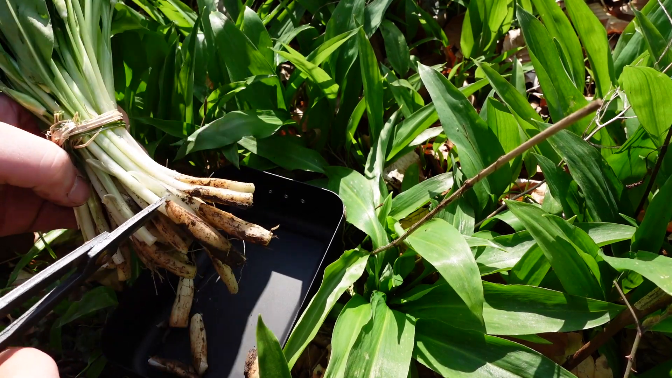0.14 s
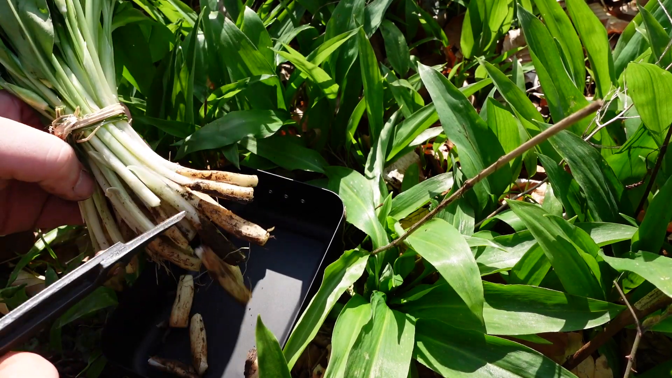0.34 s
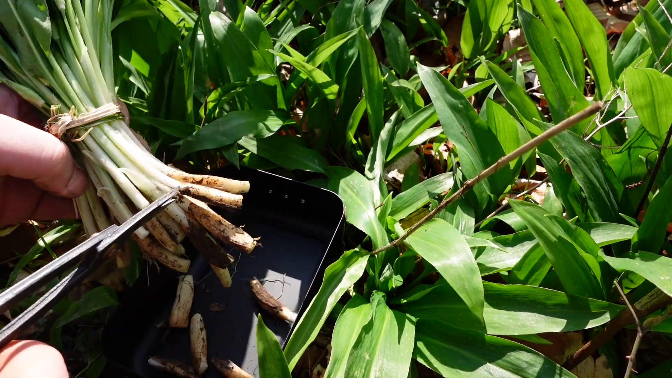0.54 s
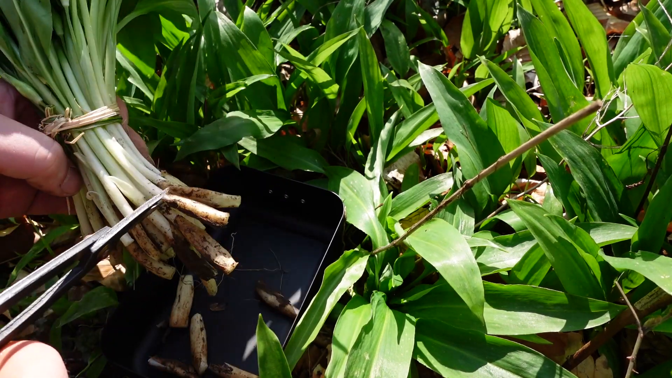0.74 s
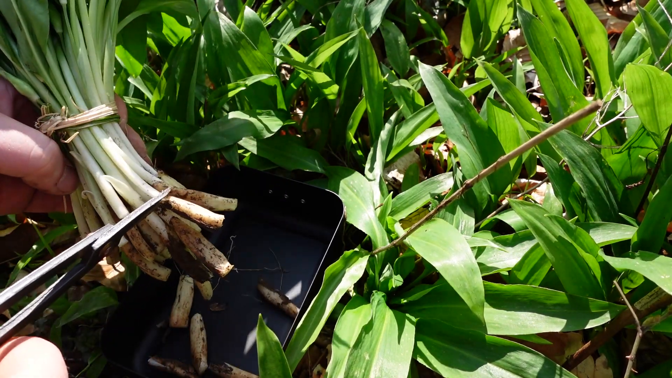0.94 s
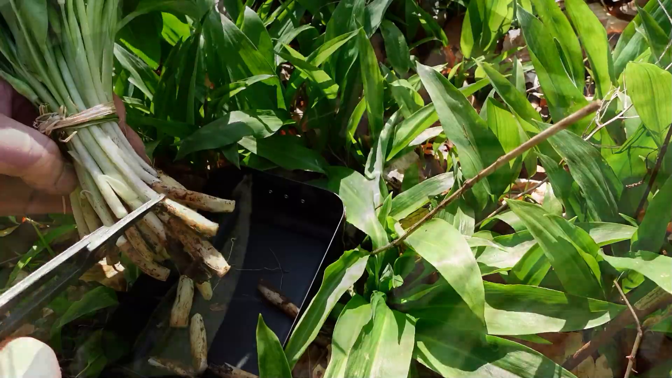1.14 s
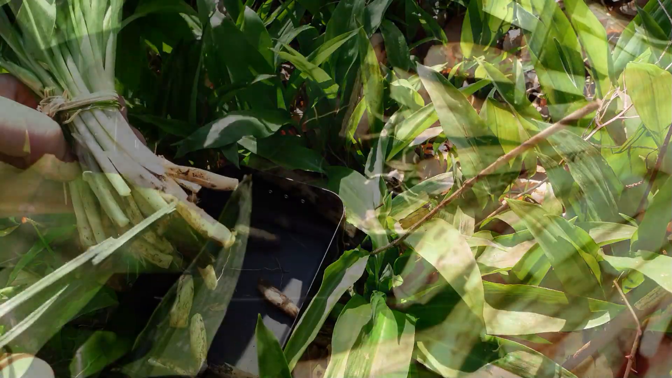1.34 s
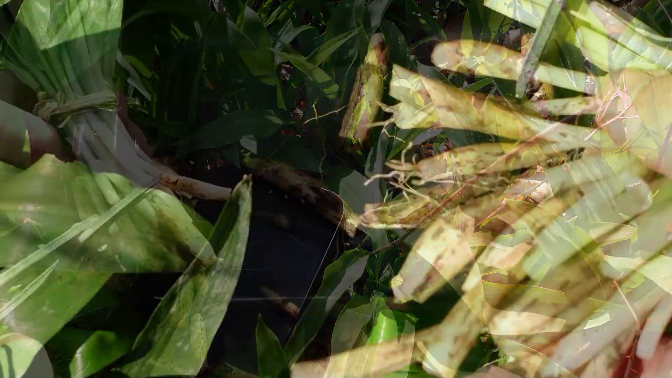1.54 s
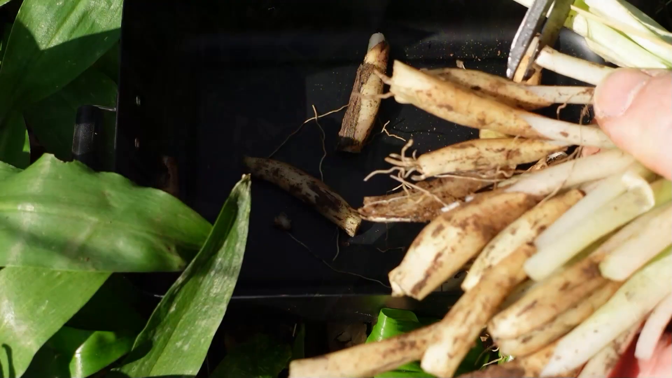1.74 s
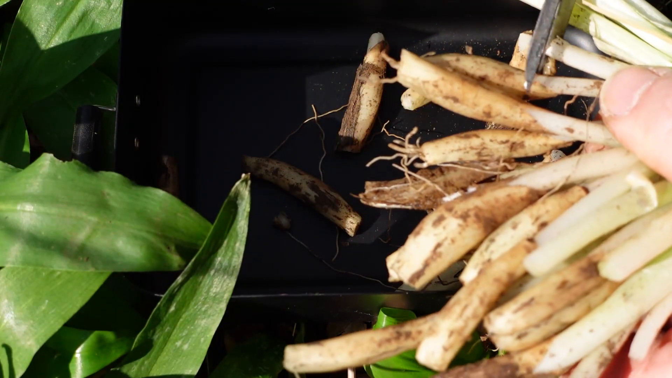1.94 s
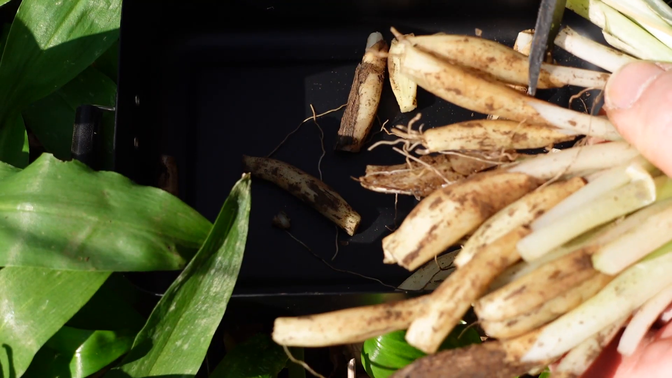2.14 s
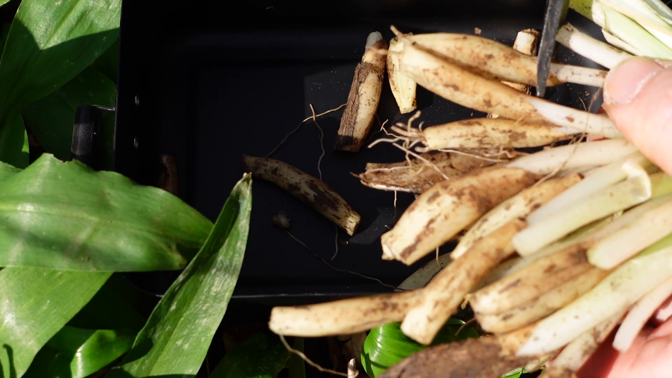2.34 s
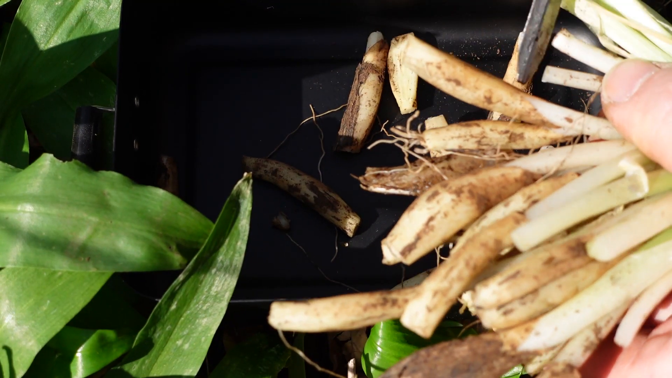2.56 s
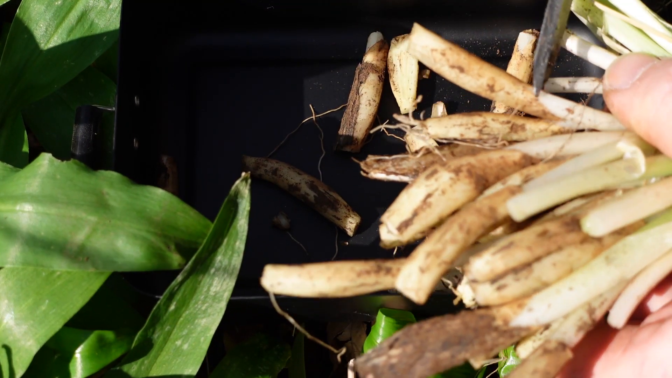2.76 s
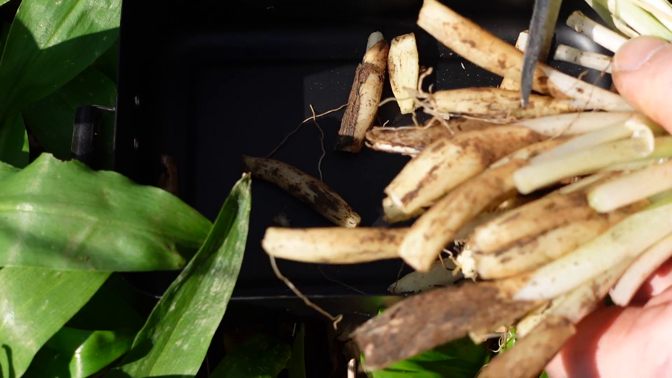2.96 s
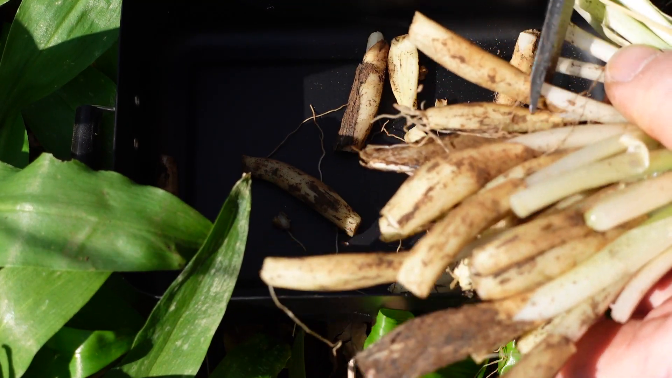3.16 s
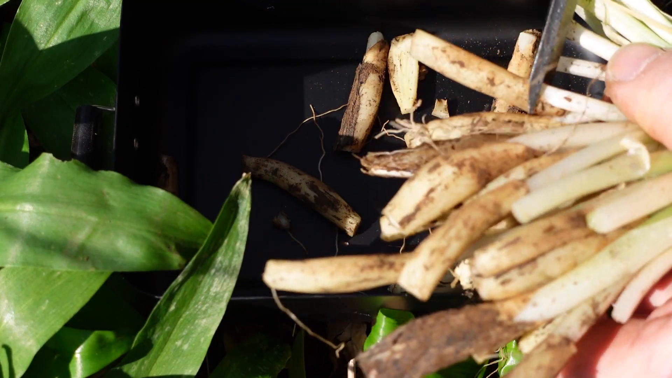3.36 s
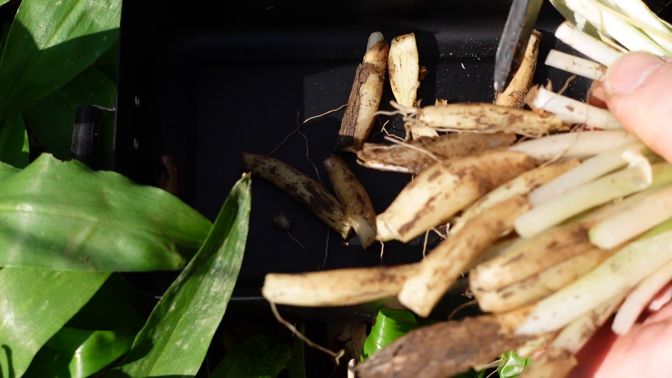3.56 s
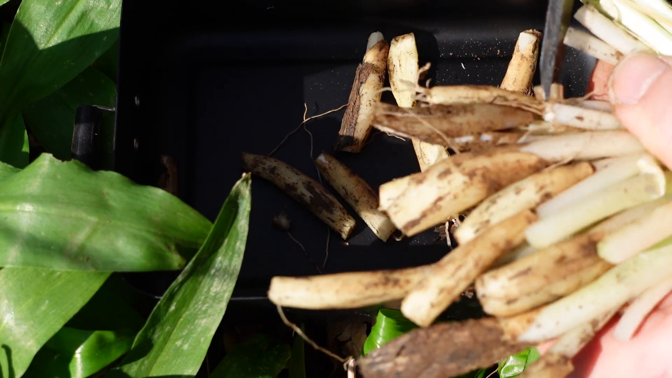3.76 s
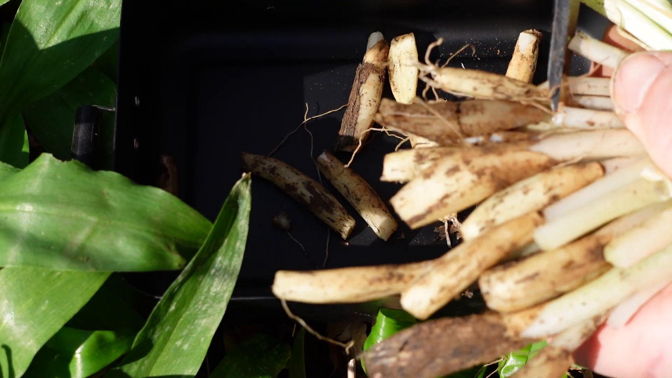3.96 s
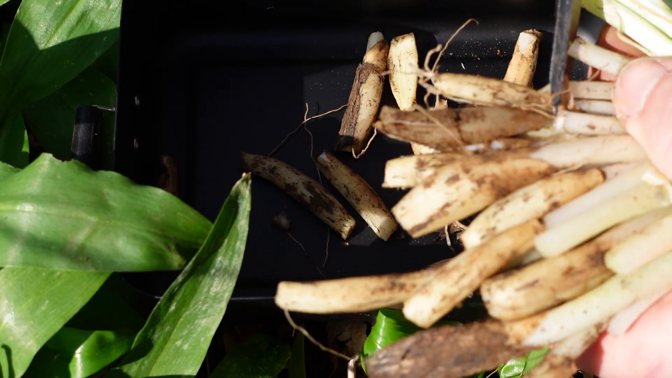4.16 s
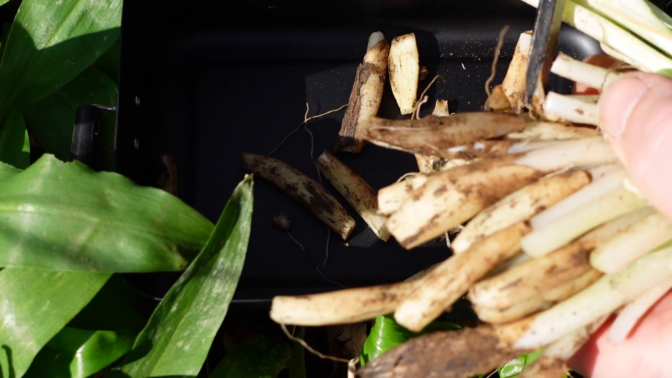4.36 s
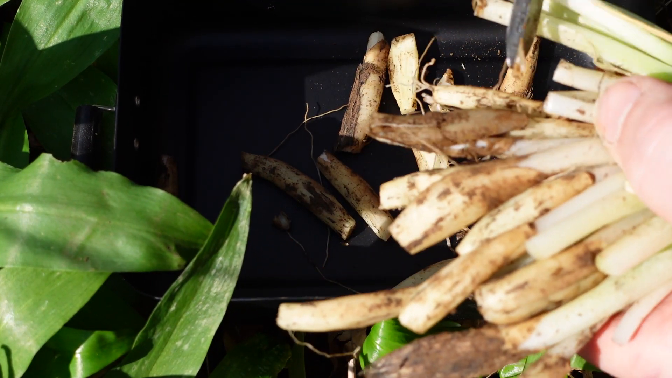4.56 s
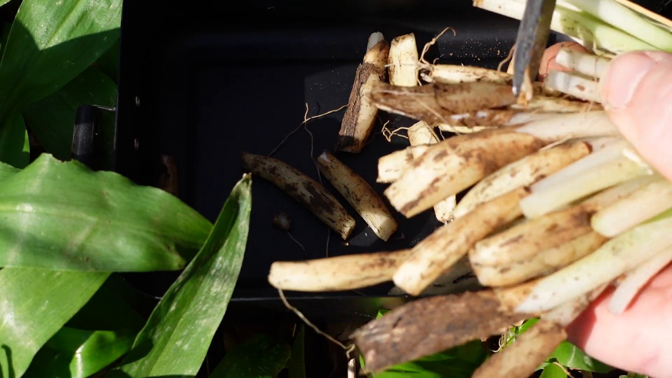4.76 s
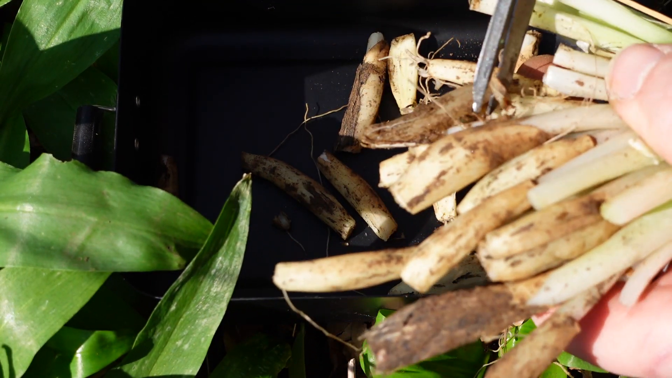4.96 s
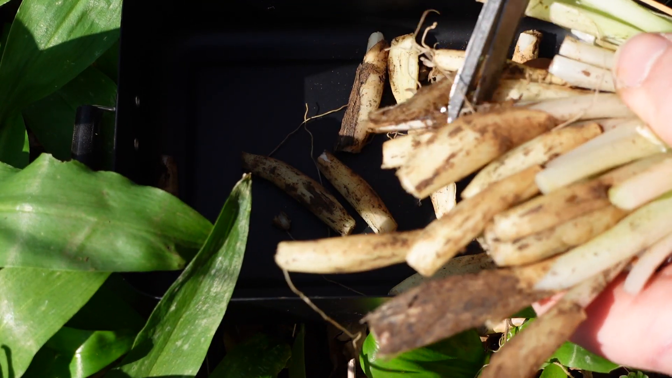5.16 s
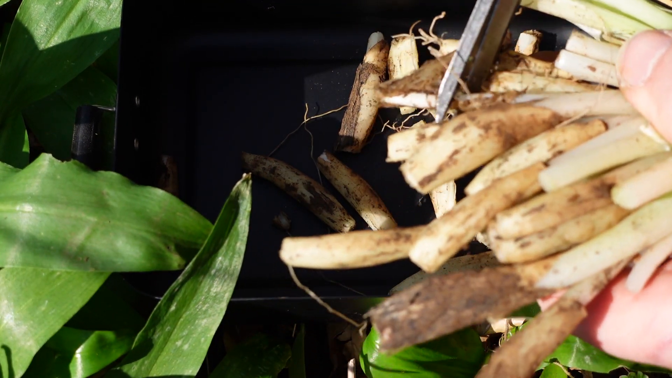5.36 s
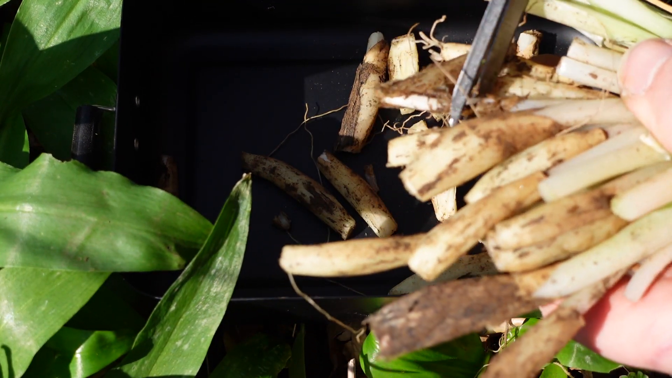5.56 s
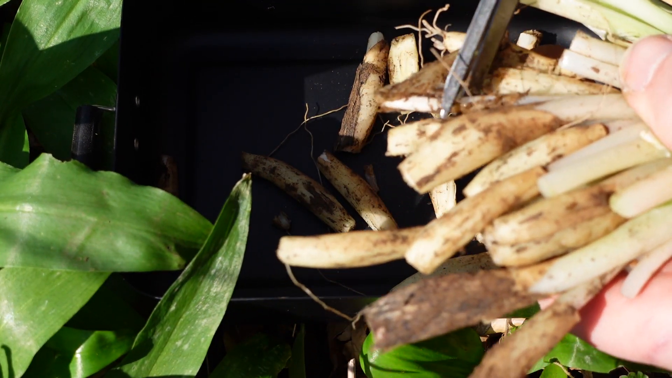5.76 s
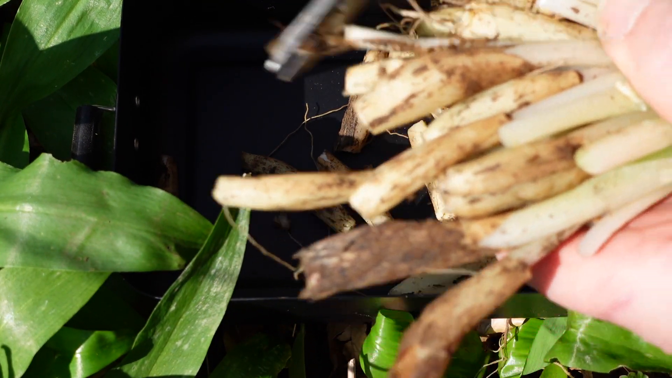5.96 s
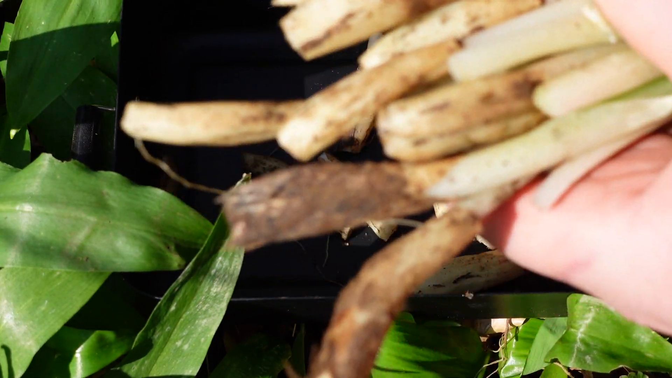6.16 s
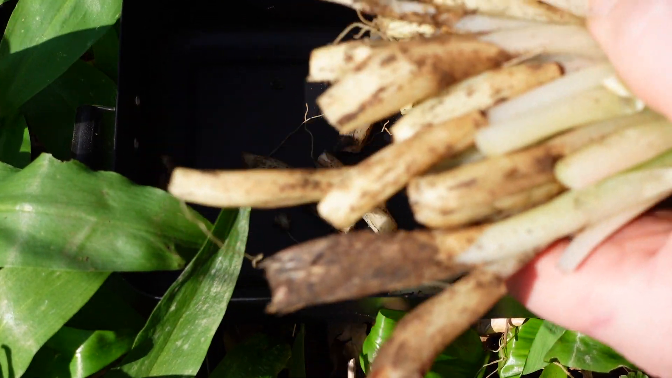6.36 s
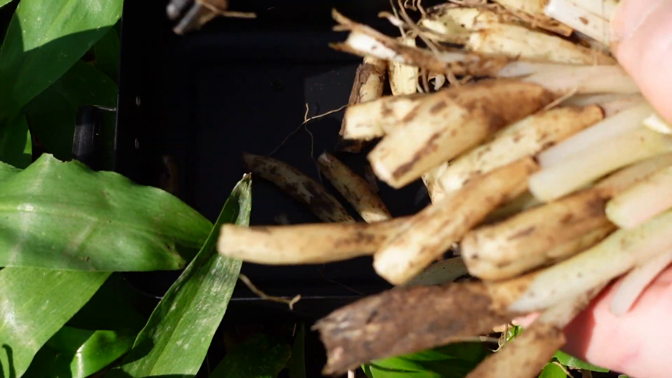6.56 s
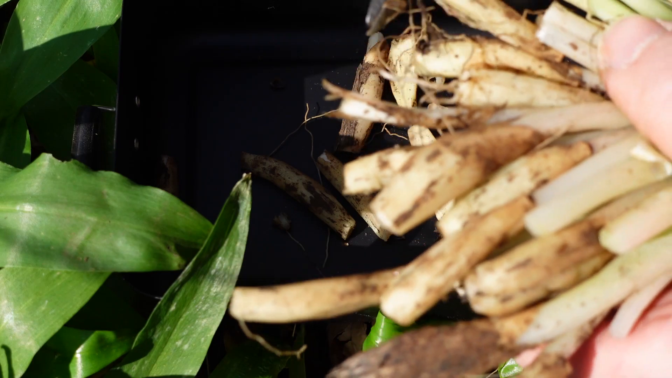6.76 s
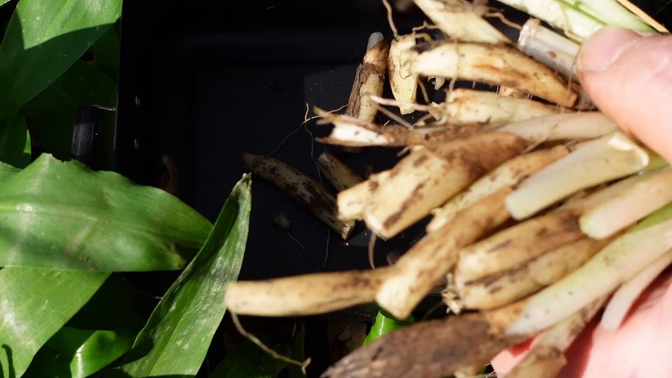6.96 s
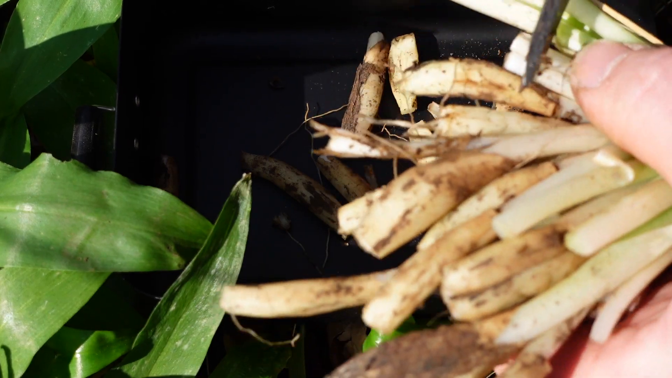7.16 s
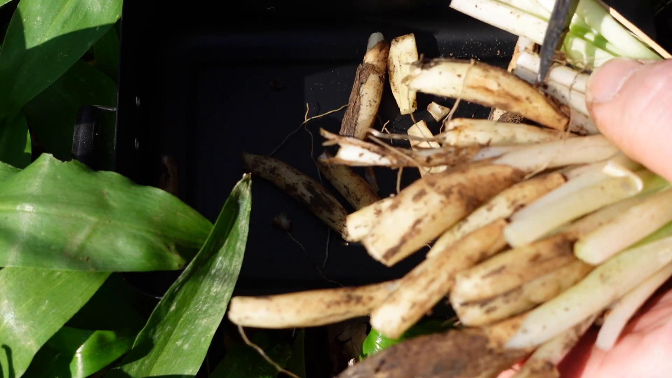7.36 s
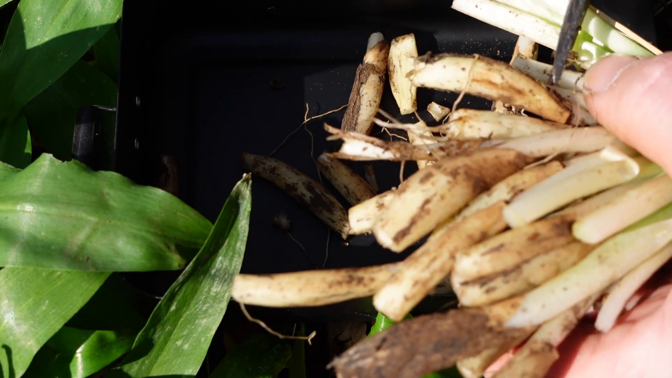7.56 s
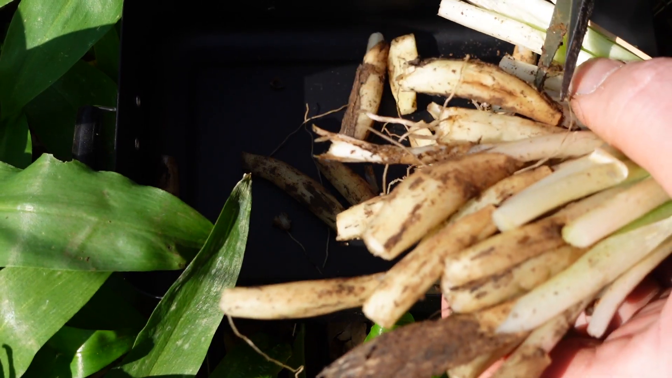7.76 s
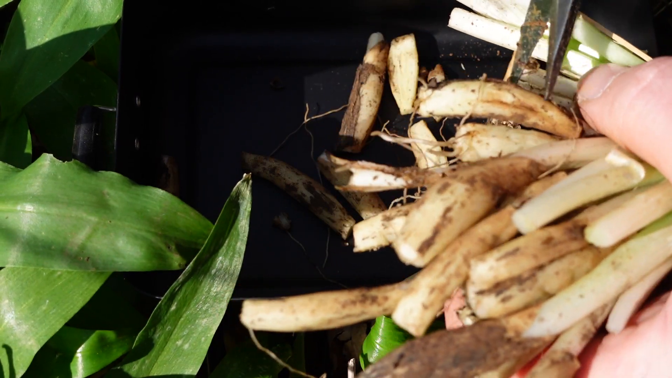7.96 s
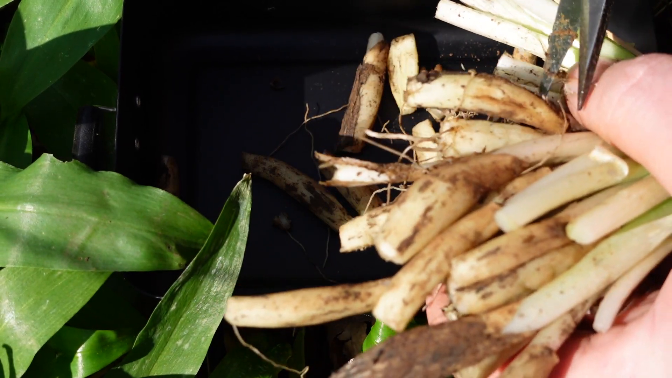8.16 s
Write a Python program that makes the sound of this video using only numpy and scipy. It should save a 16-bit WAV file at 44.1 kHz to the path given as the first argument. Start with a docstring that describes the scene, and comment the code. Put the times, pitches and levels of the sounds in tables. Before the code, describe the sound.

Crisp snips and tearing fibres, recorded close and dry outdoors. Cut bulb pieces drop onto a small metal tray in quick clusters of damped, hollow knocks, some rattling. The first cuts and drops are the loudest; then come quieter fidgeting and snips, a strong snap and a burst of papery rustling late on, and light crackling to the end over soft outdoor air and a barely audible low drone.

```python
"""In a garden, scissors snip through a bundle of fresh bulbs held over a thin metal tray.
Snapping fibres are short coloured noise bursts; rustling is flickering band noise with crackles in it.
Cut pieces land as damped thumps that ring the tray's modes; around some landings the tray also buzzes.
Quiet outdoor air is steady band noise; a low drone, noise in resonances, fades early and faintly returns."""
import sys
import numpy as np
from scipy import signal
from scipy.io import wavfile

SR = 44100
rng = np.random.default_rng(int(sys.argv[2]) if len(sys.argv) > 2 else 0)


def inscribe(sig):
    """Save sig as 16-bit PCM at rate SR to the path in sys.argv[1].

    A 1-D sig is mono; a 2-D sig holds one channel per row.
    Samples are clipped to [-1, 1] before scaling.
    """
    pcm = np.round(np.clip(np.atleast_2d(sig).T, -1, 1) * 32767)
    wavfile.write(sys.argv[1], SR, pcm.astype(np.int16))


N = 362061  # length [samples]


def amp(db):
    """Decibel law: a level in dB becomes an amplitude gain."""
    return 10 ** (np.asarray(db) / 20)


def rms_one(x):
    """Power normalisation: scale to an rms of 1."""
    return x / np.sqrt(np.mean(x ** 2) + 1e-20)


def in_time(rows):
    """Linear interpolation: the columns of a curve table at every sample."""
    s, *columns = np.transpose(rows)
    return [np.interp(np.arange(N) / SR, s, column) for column in columns]


def at_hz(points, hz):
    """Interpolation along pitch: read a spectrum on a log-frequency axis."""
    point_hz, value = np.array(points).T
    return np.interp(np.log(hz), np.log(point_hz), value)


def drift(rate):
    """Low-passed chance: a slow random curve with an rms of 1."""
    step = 20  # drawn once in so many samples
    r = np.exp(-2 * np.pi * step * rate / SR)
    white = rng.standard_normal(N // step + 2002)
    slow = signal.lfilter([1], [1, -2 * r, r * r], white)[2000:]  # without the filter's start
    return np.interp(np.arange(N) / step, np.arange(len(slow)), rms_one(slow))


def resonance(x, hz, width_hz):
    """Simple resonator: a two-pole band-pass with gain 1 on top."""
    r = np.exp(-np.pi * width_hz / SR)
    return signal.lfilter(np.array([1, 0, -1]) * (1 - r * r) / 2,
                          [1, -2 * r * np.cos(2 * np.pi * hz / SR), r * r], x)


def butter(x, order, hz, kind):
    """Butterworth filtering: a maximally flat pass band."""
    return signal.sosfilt(signal.butter(order, hz, kind, fs=SR, output="sos"), x)


def add(out, s, piece):
    """Superposition: mix a short sound in at s seconds."""
    i = round(s * SR)
    out[i:i + len(piece)] += piece[:N - i]


# likeness of the left and right channels of noise: (frequency [Hz], correlation [1 = alike])
LEFT_RIGHT_LIKENESS = [(60, 1), (290, 0.6), (1400, 0.86), (6800, 0.89), (15000, 0.96)]


def bands(whites, spectrum, patchy_db, rate, low_hz):
    """Subband synthesis: half-octave noise bands, each with its own level and flicker; (centre Hz, stereo)."""
    edges = low_hz * 2 ** np.arange(0, np.log2(18000 / low_hz), .5)
    together = drift(rate)  # flicker that all bands share
    for k, (low, high) in enumerate(zip(edges, edges[1:])):
        # neighbouring bands take different noise
        mid, side = butter(whites[k % 2], 2, [low, high], "band")
        hz = np.sqrt(low * high)
        alike = np.clip(at_hz(LEFT_RIGHT_LIKENESS, hz), 0, 1)
        gain = amp(at_hz(spectrum, hz) + patchy_db * (0.86 * together + drift(rate)))
        yield hz, gain * (np.sqrt(1 + alike) * mid + np.sqrt(1 - alike) * side * [[1], [-1]])


# course of the far drone: (time [s], low hum [dB], upper part [dB])
DRONE_LEVELS = [(0, -52, -58), (.8, -50.5, -54), (1.3, -58, -64), (1.9, -66.5, -56), (3.2, -75.5, -65),
                (5.8, -74.5, -69.5), (6.1, -62.5, -65), (8.21, -72, -63)]
# its resonances, the last two forming the upper part: (frequency [Hz], width [Hz], level [dB])
DRONE_RESONANCES = [(108, 32, -0.5), (185.5, 18, 0.5), (1060, 57, -22), (187, 260, -12), (900, 220, -11),
                    (1920, 140, -13)]


def drone():
    """Resonance of noise: a few peaks colour a far drone whose low hum and upper part fade apart."""
    hum_db, upper_db = in_time(DRONE_LEVELS)
    mid, side = rng.standard_normal((2, N))
    noise = mid + 0.18 * side * [[1], [-1]]
    parts = [amp(db) * resonance(resonance(noise, hz, width), hz, 2 * width)
             for hz, width, db in DRONE_RESONANCES]
    hum, upper = rms_one(sum(parts[:-2])), rms_one(sum(parts[-2:]))
    return (amp(hum_db) * hum + amp(upper_db) * upper) * amp([[.8], [-.8]])  # a little to the left


AIR_DB = -59.5  # rms level
# spectrum of the outdoor air: (frequency [Hz], density [dB per Hz])
AIR_SPECTRUM = [(30, -26.5), (55, -12), (100, -7), (215, -10), (320, -17.5), (700, -13), (1000, -14.5),
                (1500, -9), (2700, -26), (6000, -25.5), (16000, -36.5)]


def air():
    """Broadband noise: the steady outdoor background, weighted by its spectrum."""
    whites = rng.standard_normal((2, 2, N))
    noise = sum(band for hz, band in bands(whites, AIR_SPECTRUM, patchy_db=1.5, rate=2.5, low_hz=27.26))
    return amp(AIR_DB) * rms_one(noise) * amp([[.5], [-.5]])  # a little to the left


TRAIL_RISE_S = 0.0054  # time constant


def trail(rows, level_db, t60):
    """Exponential decay of energy: power that swells and dies after each event."""
    kicks = np.zeros(N)
    for s, peak_db, *rest in rows:
        kicks[round(s * SR)] += amp(2 * (peak_db + level_db))
    fall, rise = amp(-120 / (t60 * SR)), np.exp(-1 / (TRAIL_RISE_S * SR))
    return signal.lfilter([1 - rise], np.poly([fall, rise]), kicks + 1e-18)


TREBLE_DB = -4.5  # grip rustle above 6 kHz against the rest
SHEAR_EDGE_S, SHEAR_DULL_DB = 0.023, -4  # fade at both ends; part from 2.5 to 6 kHz
# pieces slide on after a knock: level against the knock's, decay, part above 6 kHz
SETTLE_DB, SETTLE_T60_S, SETTLE_TREBLE_DB = -35, 0.1, -4
# stems spring back after a snap: level against the snap's, decay, part above 6 kHz, part under 2.5 kHz
STIR_DB, STIR_T60_S, STIR_TREBLE_DB, STIR_BASS_DB = -22, 0.08, -4.5, 5
STIR_FULL_S = 0.036  # snaps with a shorter t60 stir less
# how much the bundle moves in the hand: (time [s], rustle level [dB])
GRIP_LEVELS = [(0, -50), (.4, -50.5), (.6, -44), (.95, -58), (1.25, -57), (1.97, -54.5), (2.07, -42.5),
               (2.2, -59.5), (2.5, -50.5), (2.75, -40.5), (2.84, -56), (2.95, -49), (3.3, -69.5),
               (3.48, -48), (3.6, -54), (3.89, -45), (4.17, -61.5), (4.4, -47), (4.66, -53.5), (5.09, -51),
               (5.25, -59), (5.45, -54), (5.6, -71.5), (5.8, -63.5), (5.93, -46), (6.04, -34.5), (6.2, -44),
               (6.41, -37.5), (6.61, -43.5), (6.8, -42.5), (6.855, -35), (6.875, -48.5), (6.99, -42),
               (7.13, -48.5), (7.2, -42), (7.4, -49.5), (7.6, -41), (7.645, -47), (7.66, -57), (7.7, -53.5),
               (7.81, -44), (8.21, -51.5)]
# the blades close on the stems and shear their skins: (start [s], end [s], hiss level [dB])
BLADE_SHEARS = [(0.274, 0.364, -45), (1.137, 1.187, -46.5), (1.195, 1.203, -36), (1.549, 1.607, -44),
                (2.419, 2.464, -42), (3.341, 3.453, -50), (4.221, 4.375, -46.5), (6.218, 6.28, -33)]


def rustle_power():
    """Addition of incoherent powers: grip, shear, settling and springing under 2.5, up to 6, above 6 kHz."""
    t = np.arange(N) / SR
    grip = amp(2 * in_time(GRIP_LEVELS)[0])
    shear = 0
    for start, end, db in BLADE_SHEARS:
        fade = np.clip(np.minimum(t - start, end - t) / SHEAR_EDGE_S + .5, 0, 1)
        shear = shear + amp(2 * db) * fade ** 2
    pulls = [(s, db + 40 * np.log10(min(t60 / STIR_FULL_S, 1))) for s, db, hz, t60 in FIBRE_SNAPS]
    settle = trail(LANDINGS, SETTLE_DB, SETTLE_T60_S)
    stir = trail(pulls, STIR_DB, STIR_T60_S)
    low = grip + settle + amp(2 * STIR_BASS_DB) * stir
    middle = grip + amp(2 * SHEAR_DULL_DB) * shear + settle + stir
    high = (amp(2 * TREBLE_DB) * grip + shear
            + amp(2 * SETTLE_TREBLE_DB) * settle + amp(2 * STIR_TREBLE_DB) * stir)
    return low, middle, high


# spectrum of the rubbing skins: (frequency [Hz], density [dB per Hz])
SKIN_SPECTRUM = [(300, -13), (700, -10.5), (1400, -4.5), (2200, -3), (3700, -3.5), (5200, -4.5),
                 (9600, -11.5), (16000, -25)]


def rustle(grains_per_s, grain_db, spread_db):
    """Friction noise: dry skins rub in flickering patches, with tiny crackles of uneven size."""
    low, middle, high = rustle_power()
    sizes = amp(grain_db + spread_db * np.minimum(rng.exponential(1, (2, 1, N)), 2.5))
    born = rng.random((2, 1, N)) < grains_per_s / SR
    whites = rng.standard_normal((2, 2, N))
    # a crackle swells and fades in 2 ms
    whites *= 1 + signal.lfilter([.1], np.poly([.96, .96]), sizes * born)
    dull, plain, bright = 0, 0, 0
    for hz, band in bands(whites, SKIN_SPECTRUM, patchy_db=2.2, rate=35.0, low_hz=180):
        if hz < 6000:
            dull = dull + band * np.sqrt(low if hz < 2500 else middle)
            plain = plain + band  # reference for the level
        else:
            bright = bright + band
    return dull / np.sqrt(np.mean(plain ** 2)) + np.sqrt(high) * rms_one(bright)


def crackles(per_s, level_db, cycles, clump_db):
    """Random impulse process: skins crack under the grip in clumps of uneven clicks whose colour wanders."""
    sizes = amp(5 * np.minimum(rng.exponential(1, N), 3.2)) * rng.choice([-1, 1], N)
    born = rng.random(N) < per_s * amp(clump_db * drift(14.0)) / SR
    clicks = sizes * born
    pitches = np.geomspace(1400, 11000, 12)  # Hz
    dealt = np.clip(np.round(5 + 2.5 * drift(9.0) + rng.normal(0, 1.5, N)), 0, 11)  # pitch number
    out = 0
    for k, hz in enumerate(pitches):
        width = hz / cycles
        out = out + resonance(resonance(clicks * (dealt == k) + 1e-18, hz, width), hz, width)
    return amp(level_db + in_time(GRIP_LEVELS)[0]) * rms_one(out)


# fibres and skins snap: (time [s], peak level before the high-pass [dB], brightest frequency [Hz], t60 [s])
FIBRE_SNAPS = [(0.1334, -22.5, 4080, 0.035), (0.2517, -27, 5100, 0.013), (0.2893, -9, 6200, 0.02),
               (0.3036, -8.5, 8700, 0.017), (0.3275, -12.5, 4730, 0.017), (0.369, -29, 6160, 0.02),
               (0.5117, -20, 4930, 0.026), (1.186, -11.5, 7400, 0.018), (1.2057, -4.5, 6000, 0.014),
               (1.5684, -15, 6940, 0.0046), (1.572, -22, 6150, 0.05), (1.6286, -31, 4900, 0.021),
               (1.794, -34.5, 4500, 0.037), (1.8386, -27.5, 3900, 0.027), (2.188, -31, 5230, .008),
               (2.23, -36, 1680, 0.01), (2.2777, -29.5, 1680, 0.025), (2.291, -33, 1700, 0.016),
               (2.415, -20, 6960, 0.011), (2.4457, -32, 9200, 0.025), (2.453, -21, 9250, 0.046),
               (2.4794, -9.5, 5700, 0.011), (2.647, -13.5, 5000, 0.034), (2.658, -23.5, 5150, 0.02),
               (2.6967, -33, 4910, 0.014), (2.737, -27, 3380, 0.014), (2.756, -24, 5470, 0.022),
               (2.795, -31, 2740, 0.053), (2.8942, -25, 4580, 0.041), (3.3484, -32, 9260, 0.073),
               (3.4257, -13.5, 3890, 0.011), (3.4322, -20, 4020, 0.023), (3.795, -28.5, 4200, 0.013),
               (3.886, -25, 4950, 0.022), (3.911, -23.5, 4900, 0.022), (4.1333, -34, 4460, .012),
               (4.149, -32.5, 4460, 0.0087), (4.188, -33.5, 4670, 0.029), (4.295, -30, 5050, 0.044),
               (4.3063, -19, 7500, 0.029), (4.348, -14, 2300, 0.0088), (4.34, -28, 9000, .02),
               (4.311, -19.5, 3180, 0.025), (4.3479, -9, 6600, 0.01), (4.637, -39, 1530, 0.013),
               (4.693, -34.5, 1550, .015), (4.73, -33, 5200, 0.011), (4.9635, -35, 4900, 0.017),
               (5.128, -26.5, 2750, 0.046), (5.2107, -38, 8010, 0.0082), (5.2625, -38, 6540, .01),
               (5.2985, -36.5, 4100, 0.072), (5.4112, -38.5, 6850, 0.017), (5.9773, -25.5, 4920, 0.054),
               (6.101, -24, 8330, 0.07), (6.2263, -12.5, 3570, 0.026), (6.2352, -10.5, 3550, 0.03),
               (6.249, -17, 3300, 0.056), (6.264, -24, 3300, 0.047), (6.3183, -22, 3870, 0.023),
               (6.3829, -22, 3340, 0.22), (6.453, -31, 6860, 0.022), (6.506, -24, 4530, 0.14),
               (6.5792, -22.5, 3680, 0.011), (6.588, -24, 3350, .025), (6.658, -29.5, 5030, .05),
               (6.703, -20, 4700, 0.032), (6.716, -24.5, 2650, 0.063), (6.8357, -28, 3300, 0.037),
               (6.894, -26.5, 4070, 0.057), (6.931, -15.5, 5100, 0.0057), (6.948, -23, 5010, 0.015),
               (6.972, -29, 3960, 0.084), (7.063, -27, 4650, 0.056), (7.213, -32, 5540, 0.13),
               (7.286, -28.5, 1800, 0.014), (7.153, -25.5, 5650, 0.034), (7.335, -33, 4470, 0.016),
               (7.3671, -21, 6000, 0.011), (7.39, -24.5, 4660, 0.033), (7.4906, -18, 6600, 0.02),
               (8.026, -29, 2050, 0.036), (8.084, -30, 6300, 0.013), (8.1655, -22.5, 3380, 0.031)]


def snaps(broad, low_hz, rise_s):
    """Sudden release of strain: a noise burst brightest around its own pitch, slower in rise if weak."""
    out, t = np.zeros(N), np.arange(3000) / SR
    noise = rng.standard_normal((len(FIBRE_SNAPS), len(t)))
    for (s, peak_db, hz, t60), burst in zip(FIBRE_SNAPS, noise):
        weak = np.clip((-22.0 - peak_db) / 12, 0, 1)
        rise = 0.000091 + (rise_s + 0.041 * t60) * weak  # weak ones, above all long ones, tear slowly
        burst = burst * amp(-60 * t / t60) * (1 - np.exp(-t / rise))
        narrow = max(weak, min(t60 / 0.26, 1))  # weak and long ones sound narrower
        peaked = resonance(resonance(burst, hz, 1.1 * hz), hz, hz)
        coloured = peaked + broad * (1 - .5 * narrow) * burst
        add(out, s, amp(peak_db) * coloured / np.abs(coloured).max())
    return butter(out, 2, low_hz, "high")


# reflections from ground and leaves: (delay [s], level [dB])
REFLECTIONS = [(.004, -17), (.011, -28)]


def surroundings(x):
    """Early reflection: a few dull echoes, slightly later on the right than on the left."""
    dull = signal.lfilter([.6], [1, -.4], x)
    out = np.zeros((2, N))
    for s, level_db in REFLECTIONS:
        add(out[0], s, amp(level_db) * dull)
        add(out[1], s * 1.012, amp(level_db) * dull)
    return out


# modes of the unloaded tray: (frequency [Hz], level [dB], t60 [s])
TRAY_MODES = list(zip( [327, 466, 600, 797, 1080, 1320, 1542, 1858, 2230, 2662, 2762, 3685, 4203, 4517, 5198, 6070, 6960, 7805, 8800, 9315],
              [-14.5, -6, -3.5, -6, -8.5, -6, -5.5, -4.5, -11.5, -21, -21.5, -20.5, -11.5, -11.5, -7.5, -8, -20.5, -15, -6, -8],
              [0.2, 0.09, 0.0222, 0.05, 0.079, 0.093, 0.085, 0.041, 0.074, 0.12, 0.17, 0.09, 0.09, 0.021, 0.0298, .04, 0.061, 0.038, 0.03, 0.05]))


def tray(force):
    """Modal superposition: the tray's modes ring as damped oscillators, each driven by one row of force."""
    out = 0
    for row, (hz, level_db, t60) in zip(force, TRAY_MODES):
        r, w = amp(-60 / (t60 * SR)), 2 * np.pi * hz / SR
        out = out + signal.lfilter([0, amp(level_db) * np.sin(w)],
                                   [1, -2 * r * np.cos(w), r * r], row + 1e-18)
    return out


# second touch of a landed piece: mean delay, mean level, share of the thump's pitch
ROCK_S, ROCK_DB, ROCK_PITCH = .008, -12, 0.8
# later landings find pieces in the tray, which shorten its ring to this share
LOADED_S, LOADED_RING = 1.5, 0.83
DETUNE, RING_SPREAD = 0.024, 0.26  # each landing bends the modes and alters their decay by chance
# a piece lands or bounces: (time of the thump envelope's top [s], envelope level [dB], thump frequency [Hz],
# strongest ring frequency [Hz], ring drive against the thump before the common ring gain [dB])
LANDINGS = [(0.4505, -23.5, 342, 1170, -4), (0.5219, -16.5, 1170, 1290, 1), (0.5675, -3.5, 785, 1060, -6),
            (0.5705, -21, 480, 466, 5.5), (0.603, -18, 615, 1080.0, -40), (0.653, -28, 455, 1320.0, -29),
            (1.3314, -14, 880, 1080.0, -4.5), (1.351, -12, 790, 1080.0, -10.5),
            (1.4351, -18.5, 1180, 1860, -11.5), (1.557, -30, 1200, 1100.0, -10),
            (1.6761, -17.5, 880, 1500, -13.5), (1.483, -41, 600, 1080, -11), (1.715, -33, 735, 1360.0, -30),
            (1.754, -27.5, 586, 600.0, -11.5), (1.787, -30.5, 510, 1870.0, -8),
            (1.8237, -34, 633, 600.0, -6), (1.8363, -17.5, 624, 1090, -11.5),
            (1.8395, -18, 704, 1090.0, -34), (1.926, -22.5, 770, 600.0, -16), (1.945, -28, 736, 610, -11),
            (2.0242, -18.5, 750, 1060.0, -14), (2.5242, -33, 760, 1500, -12), (2.551, -7, 885, 1090.0, -22),
            (2.628, -21.5, 670, 820.0, -16), (2.6475, -24, 2190, 2230, -2.5), (2.6573, -29, 1140, 2230, -7),
            (2.693, -23.5, 550, 1920.0, -37), (2.7128, -32.5, 814, 600, -5), (3.51, -12.5, 900, 1330.0, -8),
            (3.525, -10, 814, 1320.0, -18.5), (3.5394, -17.5, 780, 1310.0, -15.5),
            (3.5598, -22.5, 550, 780.0, -17), (3.5735, -18, 785, 600.0, -19.5), (3.584, -34, 520, 600, -8),
            (3.6173, -37, 520.0, 2110, -9), (3.663, -12, 800, 1860, -15.5),
            (3.6923, -22.5, 880, 1320.0, -12.5), (3.708, -27.5, 634, 1320.0, -35),
            (4.4858, -31.5, 595, 1320.0, -13), (4.5999, -31, 1250, 1330.0, -12.5),
            (4.8627, -37.5, 1574, 1260, -31), (5.437, -34, 912, 1360, -10.5), (6.42, -22, 1820, 1980, -24),
            (6.438, -22.5, 2100, 1980.0, -27), (6.455, -26, 1680, 1980, -10), (6.471, -32, 1480, 1540, -22),
            (7.171, -23.0, 620, 1860, -13.5), (7.256, -32, 580, 1680, -10.5),
            (7.502, -26.5, 1590, 1410.0, -41)]


def knocks(rise_cycles, reach_octaves, far_db, whole_db, loaded_db, tick_db, soft_hz, small_hz):
    """Soft impact: a short thump with a faint tick, and modes ringing most near the listed ring frequency."""
    thumps, rings = np.zeros(N), np.zeros(N)
    t, long = np.arange(1500) / SR, np.arange(9000) / SR
    luck = rng.standard_normal((len(LANDINGS), 3, len(TRAY_MODES), 1))
    skins = rng.standard_normal((len(LANDINGS), len(t)))
    mode_hz, mode_db, mode_t60 = np.transpose(TRAY_MODES)[:, :, None]
    swing = (-1) ** np.arange(len(TRAY_MODES))  # neighbouring modes start in opposite directions
    for (s, peak_db, hz, ring_hz, ring_db), (uneven, bend, damp), skin in zip(LANDINGS, luck, skins):
        rise = rise_cycles / hz + 0.00042
        squash = (t / rise * np.exp(1 - t / rise)) ** 2  # the flesh squashes and springs back
        thump = squash * np.sin(2 * np.pi * hz * (t - rise))
        tick = amp(tick_db - 60 * t / 0.042) * resonance(skin, 2 * hz, 2 * hz)
        add(thumps, s - rise, amp(peak_db) * (thump + tick))

        # it rocks over and touches again, duller
        rock = squash * np.sin(2 * np.pi * ROCK_PITCH * hz * (t - rise))
        rock_delay = ROCK_S * (1 + .15 * np.clip(bend[0, 0], -2, 2))
        add(thumps, s - rise + rock_delay, amp(peak_db + ROCK_DB + 2 * damp[0, 0]) * rock)

        near_db = np.maximum(-6 * (np.log2(mode_hz / ring_hz) / reach_octaves) ** 2, far_db)
        loaded = s > LOADED_S
        near_db[mode_hz < 400] = loaded_db if loaded else whole_db  # the whole tray flexes wherever hit
        loose = np.clip(-near_db / 4, .2, 1)  # far modes vary most
        t60 = mode_t60 * (LOADED_RING if loaded else 1) * np.exp(RING_SPREAD * damp * loose)
        level = amp(peak_db + ring_db + mode_db + near_db + 3 * uneven * loose - 60 * long / t60)
        bent_hz = mode_hz * (1 + DETUNE * bend * loose)
        add(rings, s, swing @ (level * np.sin(2 * np.pi * bent_hz * long)))
    blunt = butter(rings, 2, soft_hz, "low")
    # a small tray radiates no deep bass
    return butter(thumps + amp(10.0) * blunt, 4, small_hz, "high")


BUZZ_SWELL_S, BUZZ_T60_S = .0055, 0.049
# spectrum of the buzzing hiss: (frequency [Hz], density [dB per Hz])
BUZZ_SPECTRUM = [(600, -2.5), (1500, -5), (3000, -9), (5500, -3), (9000, -11.5), (16000, -8)]
# the tray buzzes around a landing, often from just before its top:
# (start [s], drive level [dB], strongest ring frequency [Hz])
TRAY_BUZZES = [(0.4526, -6, 5600), (0.5213, -14, 4200), (0.5678, 1.5, 5200), (0.579, -12, 4220),
               (1.3309, -4.5, 5200), (1.349, -7, 2700), (1.6742, -6.5, 6070), (1.711, -17.5, 2700),
               (2.012, -20, 4170), (2.55, -4.5, 2770), (2.655, -19.5, 2240), (3.509, -8.5, 4200),
               (3.522, -15.5, 2700)]


def buzzes(modes_db, focus_db, low_hz):
    """Contact chatter: loose pieces and grit on the shaken tray hiss in a burst and ring its high modes."""
    count = len(TRAY_MODES)
    shake, force, t = np.zeros(N), np.zeros((count, N)), np.arange(6000) / SR
    when = rng.uniform(.4, 1.6, (len(TRAY_BUZZES), count))
    luck = rng.normal(0, 3, (len(TRAY_BUZZES), count))
    mode_hz = np.array(TRAY_MODES)[:, 0]
    for (s, peak_db, ring_hz), late, uneven in zip(TRAY_BUZZES, when, luck):
        swell = 1 - np.exp(-(t / BUZZ_SWELL_S) ** 2)
        add(shake, s, amp(peak_db - 60 * t / BUZZ_T60_S) * swell)
        near_db = focus_db * np.exp(-(np.log2(mode_hz / ring_hz) / .12) ** 2)
        kick_at = ((s + BUZZ_SWELL_S * late) * SR).astype(int)
        force[np.arange(count), kick_at] += amp(peak_db + modes_db + near_db + uneven)
    whites = np.zeros((2, 2, N))
    whites[:, 0] = rng.standard_normal((2, N))  # no side part: the hiss is mono
    chatter = bands(whites, BUZZ_SPECTRUM, patchy_db=2.0, rate=120.0, low_hz=400)
    hiss = rms_one(sum(band[0] for hz, band in chatter))
    rung = butter(tray(force), 4, low_hz, "high")
    return 0.54 * shake * hiss + rung


# where the hand works: (time [s], left minus right [dB])
HAND_PLACE = [(0, 1), (1.3, 2), (2.1, -1.5), (3, -2), (3.4, -1.5), (4, -2), (6, -3), (6.25, 1), (6.45, -2),
              (8.21, -2.5)]


def scene():
    """Superposition of sources: tray in the middle, hand sounds where the hand is, background around."""
    pan_db, = in_time(HAND_PLACE)
    side = amp(pan_db / 2 * np.array([[1], [-1]]))
    background = drone() + air()
    rubbing = rustle(grains_per_s=120.0, grain_db=-1.0, spread_db=2.5)
    cracking = crackles(per_s=220.0, level_db=-5.5, cycles=2.4, clump_db=4.5)
    cuts = snaps(broad=0.35, low_hz=1410, rise_s=0.00091)
    hand = (cuts + rubbing + cracking) * side
    metal = knocks(rise_cycles=0.64, reach_octaves=0.14, far_db=-12.0, whole_db=-16.0, loaded_db=-20.5,
                   tick_db=-12.5, soft_hz=2700, small_hz=314)
    metal += buzzes(modes_db=-15.5, focus_db=8.0, low_hz=1940)
    return metal + hand + surroundings(metal + cuts) + background


CUTOFF_HZ = 16900  # start of the stop band


def record(dry):
    """Saturation and band limiting: the highest peaks are rounded, deep bass and the top are cut."""
    rounded = dry / (1 + np.abs(dry / .95) ** 10) ** .1
    thin = butter(rounded, 2, 35, "high")
    return signal.sosfilt(signal.cheby2(16, 85, CUTOFF_HZ, fs=SR, output="sos"), thin)


dry = scene()
out = record(dry)
inscribe(out)
```